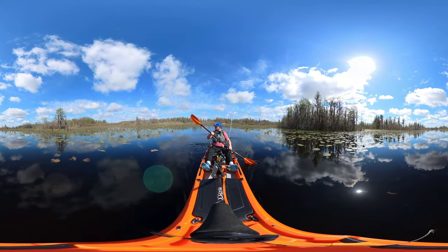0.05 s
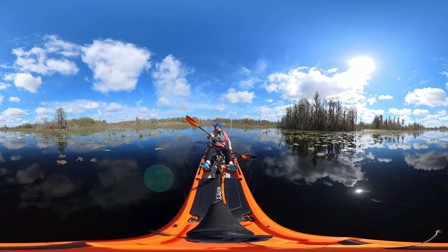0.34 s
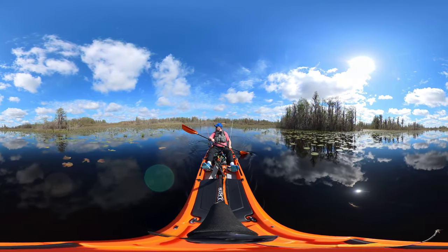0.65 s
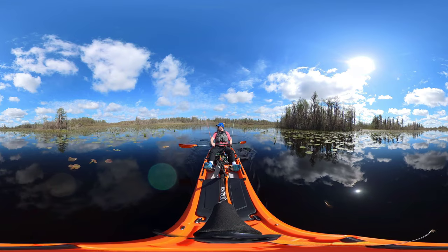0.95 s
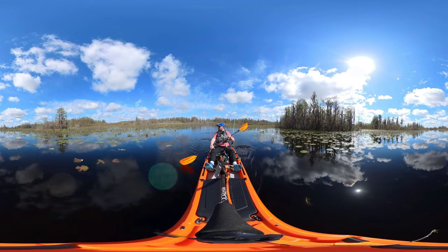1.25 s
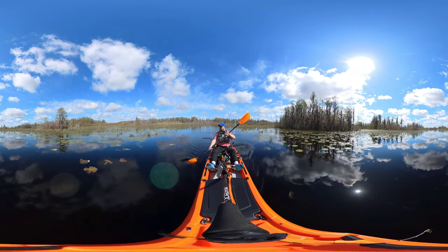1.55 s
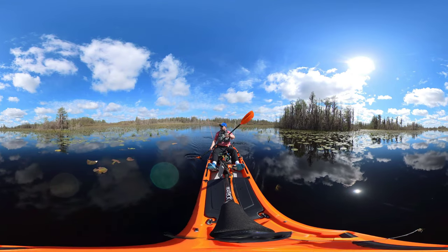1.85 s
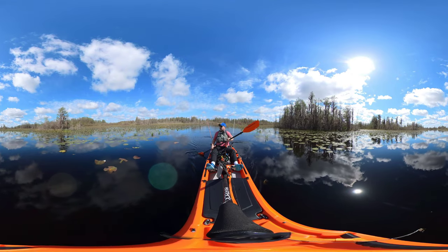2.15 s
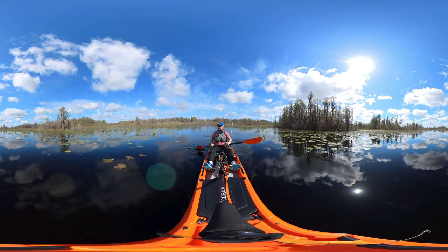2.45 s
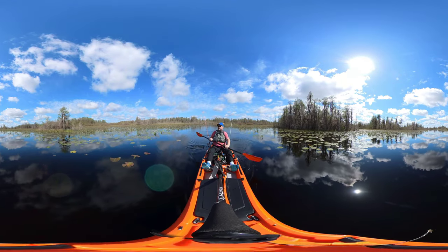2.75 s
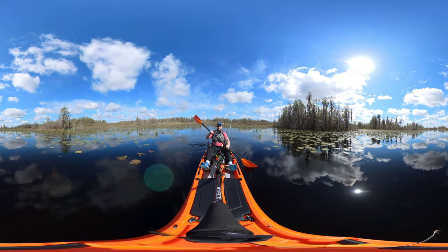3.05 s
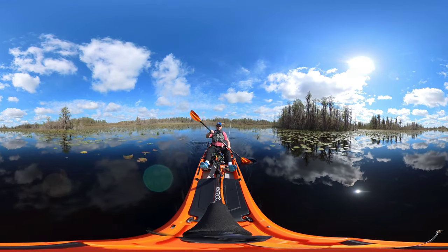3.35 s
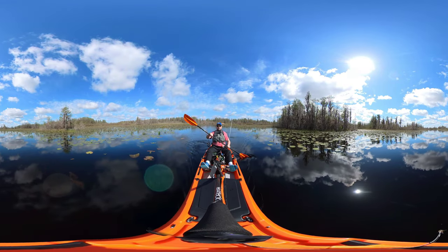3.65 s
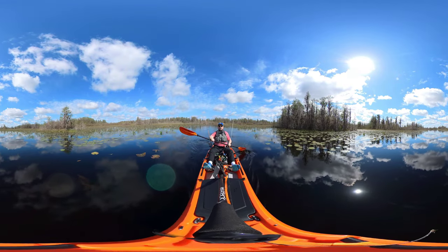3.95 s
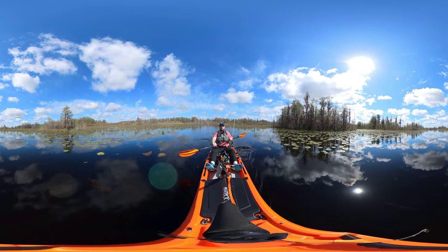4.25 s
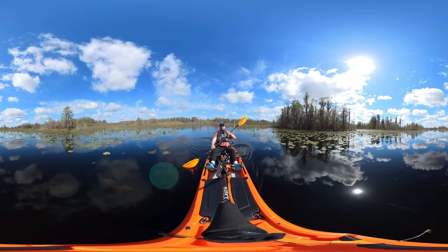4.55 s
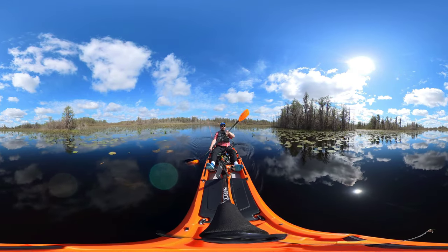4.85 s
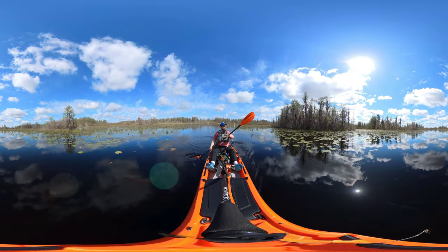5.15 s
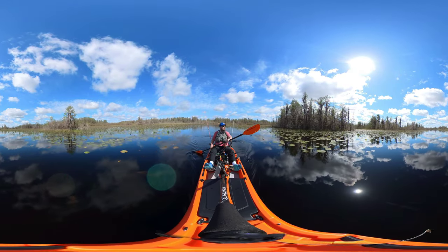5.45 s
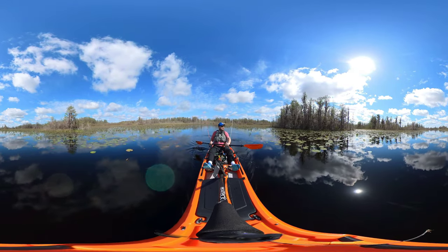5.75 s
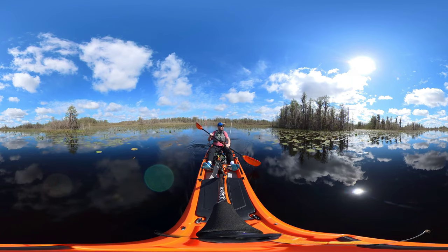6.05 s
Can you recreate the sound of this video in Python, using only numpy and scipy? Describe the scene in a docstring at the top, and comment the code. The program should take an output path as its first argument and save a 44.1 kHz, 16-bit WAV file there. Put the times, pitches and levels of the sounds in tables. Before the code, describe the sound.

A kayak paddle pulls four easy strokes through calm water, gurgling and dripping, with soft hull knocks and low wind rumble on the microphone.

```python
"""A kayak paddle pulls four easy strokes through a calm swamp, heard from the bow.
The blade churns up air bubbles, which ring (the smaller, the higher), and throws off spray.
Water drips and smacks down from the raised blade, among low glugs of water and soft knocks on the hull.
Light wind rumbles and thumps at the microphone over a very quiet open-air hush."""
import sys
import numpy as np
from scipy import signal
from scipy.fft import rfft, irfft
from scipy.io import wavfile
from scipy.ndimage import uniform_filter1d

SR = 44100
rng = np.random.default_rng(int(sys.argv[2]) if len(sys.argv) > 2 else 0)


def transcribe(u):
    """Save the signal u as a 16-bit wav file named by the first command-line argument.

    u: samples, shape (n,) or (channels, n), limited to [-1, 1]; the rate is SR.
    q: integer samples, one column per channel.
    """
    v = np.clip(np.atleast_2d(u).T, -1, 1)
    q = np.round(v * 32767).astype(np.int16)
    wavfile.write(sys.argv[1], SR, q)


N = 273420
TIME = np.arange(N) / SR

# how hard the blade stirs the water, one list per stroke: t/s, churn level/dB, splash level/dB
STROKES = [
    [(.84, -87, -83.5), (.92, -61, -81.5), (1.01, -67.5, -71), (1.1, -63, -76.5), (1.18, -66, -68.5),
     (1.27, -66.5, -76), (1.34, -72, -76), (1.43, -72, -103)],
    [(2.25, -84, -91), (2.33, -78, -89), (2.48, -78, -85.5), (2.54, -84.5, -85), (2.68, -71.5, -78),
     (2.75, -83.5, -85), (2.81, -64.5, -71), (2.86, -70.5, -73), (2.92, -83, -87)],
    [(3.8, -80, -86.5), (4.06, -75.5, -86), (4.12, -59, -67.5), (4.21, -72, -72), (4.27, -66, -84),
     (4.37, -62, -67), (4.45, -65, -78.5), (4.53, -89, -90.5), (4.7, -70, -83)],
    [(5.33, -88, -85), (5.37, -68, -85), (5.57, -74.5, -80), (5.6, -61, -71.5), (5.7, -62.5, -76),
     (5.77, -67, -86.5), (5.86, -64, -75.5), (5.93, -76, -88), (6.08, -64, -70.5), (6.19, -76, -94)],
]
# the other blade dips in and leaves a wake: t/s, churn level/dB, splash level/dB
BLADE_DIPS = [(0, -81.5, -84.5), (1.488, -72, -81.5), (3.37, -87.5, -85), (4.752, -73, -82)]
# how loud each pitch is in the gurgle, the fine spray and the larger drops: f/Hz, relative level/dB
GURGLE_SPECTRUM = [(380, -0.5), (550, 1), (850, 6.5), (1300, 8.5), (1800, 5.5), (2300, 4)]
SPRAY_SPECTRUM = [(2200, 7.5), (3000, -12.5), (3800, 0.5), (4900, -6.5), (6000, -9), (7200, 9.5),
                  (8500, -23)]
DROPLET_SPECTRUM = [(1900, -7), (2600, -6), (3600, -2), (5200, -0.5), (6600, -10)]
# the slosh around the blade and the sheet of water running off it: f/Hz, relative level/dB
SLOSH_SPECTRUM = [(150, -33.5), (330, -12.5), (480, -0.5), (850, -1.5), (1400, -14.5), (2100, -15),
                  (3200, -19), (6000, -50.5)]
SHEET_SPECTRUM = [(200, -45.5), (1200, 1.5), (2200, -11.5), (3500, -12.5), (5000, -7), (6300, -9.5),
                  (8000, -27), (9500, -27.5)]
# large air bubbles: loudest at t/s, f/Hz, level/dB, swell/s, ring/s, glide/(octaves per s)
PLOPS = [(.237, 674, -59.5, 0.00036, .008, -0.5), (.259, 938, -57.5, .0015, 0.0074, 6),
         (.657, 625, -52.5, .002, 0.015, 18), (.655, 875, -67, .012, .005, 24),
         (.672, 1188, -58, 0.011, .007, 29.5), (.7, 1305, -57, 0.014, .006, 44.5),
         (.749, 1450, -51.5, 0.0014, 0.0061, 20), (.909, 591, -41.5, 0.0038, 0.006, 6),
         (.976, 590, -42, 0.0025, 0.0085, 8), (1.032, 942, -47, 0.0031, .005, -14),
         (1.07, 773, -49.5, 0.002, 0.0097, 0.5), (1.131, 428.5, -42.5, 0.00098, 0.021, -5),
         (1.15, 790, -39, 0.00025, 0.0018, 4), (1.215, 448, -53.5, 0.0098, 0.01, -7.5),
         (1.253, 1340, -52, .003, 0.0088, 27.5), (1.267, 899, -48, .005, 0.0018, -5.5),
         (1.494, 976, -37, 0.0028, 0.00088, 12.5), (1.5, 352, -42.5, .005, 0.0031, -11.5),
         (1.649, 1003, -60, 0.0067, 0.0066, 18.5), (1.781, 1166, -58, .012, 0.0025, 12.5),
         (2.314, 1152, -55.5, 0.0014, 0.0035, 53), (2.379, 1610, -51.5, 0.0023, 0.003, 31),
         (2.624, 1800, -58, .0035, 0.0068, -14), (2.688, 947, -51.5, 0.0091, 0.0038, 26),
         (2.77, 1660, -53.5, 0.00085, 0.0066, -8), (2.697, 1336, -53.5, .007, .0012, 29.5),
         (2.769, 950, -54.5, 0.0028, .0046, -1), (2.804, 821, -46.5, .0013, 0.021, -1.5),
         (2.814, 458, -57, .002, .021, -4.5), (2.864, 806, -41.5, 0.0019, 0.0072, -3.5),
         (2.909, 1008, -62.5, 0.0055, .01, 3.5), (2.989, 750, -62, .003, .015, -9),
         (3.371, 1210, -45, 0.0016, 0.00094, 27), (3.526, 624, -63.5, .002, 0.021, 5.5),
         (3.552, 1466, -63, 0.0041, 0.012, 11.5), (3.617, 1358, -43.5, 0.005, 0.0044, 9.5),
         (3.683, 1607, -54.5, 0.0035, .0024, -23.5), (3.754, 608, -59.5, 0.0022, .008, -2),
         (3.825, 1275, -50, 0.0042, .0013, -12), (3.873, 1540, -49.5, 0.0019, 0.0036, -20),
         (3.935, 1367, -57, 0.0028, .008, 18.5), (3.961, 737, -57.5, 0.0023, .017, 4),
         (4.001, 1440, -53.5, 0.0028, .003, 4), (4.005, 529, -52.5, 0.0034, 0.03, 12),
         (4.006, 738, -51, 0.0068, 0.0076, 14), (4.124, 830, -46, 0.0073, 0.00086, -5),
         (4.149, 837, -50.5, 0.0012, .009, 12), (4.195, 1290, -50, 0.0026, 0.01, 14.5),
         (4.226, 1277, -54.5, 0.013, 0.0026, 4), (4.278, 375, -43, .005, 0.0016, 58),
         (4.325, 1010, -51, .009, 0.013, -6.5), (4.344, 488, -43.5, 0.0039, 0.022, -7.5),
         (4.497, 715, -48.5, 0.0082, 0.0078, 33), (4.749, 602, -32, 0.00021, 0.0011, 0),
         (4.84, 574, -57.5, 0.0061, .01, 0.5), (5.351, 917, -57.5, .0014, .003, 9),
         (5.371, 886, -53.5, 0.0018, 0.0019, 10), (5.428, 1864, -54, 0.00042, .004, 39),
         (5.459, 1056, -55, 0.0015, .006, 3), (5.541, 1180, -46, 0.0014, 0.0022, 32),
         (5.605, 473, -52, 0.0046, .008, 5.5), (5.639, 1240, -54, .011, 0.0085, 16.5),
         (5.666, 419, -46, .003, 0.0043, 31), (5.681, 1510, -49.5, 0.0024, .003, 8),
         (5.699, 768, -46.5, 0.00047, 0.0034, 53), (5.849, 1456, -51, 0.0028, 0.0055, -9.5),
         (5.991, 720, -57.5, 0.003, 0.017, 25)]
# drops falling from the raised blade: t/s, f/Hz, level/dB, ring/s
DRIPS = [(0.259, 3750, -64, 0.0031), (.259, 1430, -60.5, .002), (0.389, 1550, -49, 0.00065),
         (0.776, 2610, -57, 0.0021), (.993, 4660, -53.5, 0.0022), (1.06, 2190, -48, 0.00068),
         (1.079, 5070, -48, 0.00022), (1.08, 2600, -50.5, .0012), (1.164, 2610, -49.5, .0008),
         (1.174, 1820, -44, .001), (1.176, 2730, -46, 0.00091), (1.281, 2630, -52, .0008),
         (1.312, 5470, -54, .0005), (1.321, 2320, -52, .0007), (1.335, 5260, -48.5, 0.00086),
         (1.527, 2880, -57, .0017), (1.569, 2890, -45, 0.00044), (1.601, 2670, -55, 0.0011),
         (1.868, 7190, -54, 0.0001), (2.651, 2260, -55, 0.0018), (2.692, 6370, -49, 0.00014),
         (2.768, 6630, -59, .002), (2.797, 2320, -55.5, 0.0025), (2.804, 1440, -46, 0.00072),
         (2.81, 5200, -44, 0.0002), (2.848, 5770, -46, 0.00036), (2.942, 2850, -58, 0.0037),
         (2.98, 5130, -57, .0006), (3.013, 6020, -59, 0.00043), (3.465, 3000, -57, 0.0045),
         (3.512, 2714, -62, 0.0022), (3.611, 1970, -44, .0007), (3.873, 2460, -53, 0.00044),
         (3.96, 3280, -61.5, 0.0009), (4.017, 2280, -60.5, .002), (4.083, 1776, -52, .005),
         (4.108, 4750, -43.5, 0.0007), (4.108, 3610, -49, .002), (4.136, 6117, -51, 0.0013),
         (4.369, 4700, -45, .0015), (4.377, 2410, -50.5, 0.0024), (4.378, 5630, -44.5, 0.00027),
         (4.748, 1450, -43, 0.0013), (4.93, 7060, -61.5, .0006), (5.54, 5900, -47, 0.00054),
         (5.594, 2370, -51, .0008), (5.602, 1850, -50.5, .0035), (5.605, 6400, -50.5, .0006),
         (5.627, 2510, -48, .0007), (5.695, 2350, -47.5, .002), (5.71, 5900, -55, 0.00057),
         (6.07, 1320, -41.5, 0.00022), (6.071, 2210, -46.5, 0.0013)]
# water smacking the surface: t/s, centre f/Hz, level before fading/dB, decay/s
SPLATS = [(.388, 1880, -63, 0.0086), (.638, 590, -59, 0.034), (.776, 2090, -74, .043),
          (1.026, 1700, -60, 0.018), (1.074, 3500, -62.5, 0.017), (1.171, 4500, -65, .012),
          (1.256, 2240, -54.5, 0.011), (1.319, 5500, -67, 0.011), (1.491, 650, -53.5, .041),
          (1.568, 3200, -77, .018), (1.866, 6500, -58, 0.0024), (2.026, 1500, -63.5, 0.013),
          (2.344, 1440, -68, 0.025), (2.442, 1550, -60.5, 0.023), (2.477, 3000, -43, 0.0031),
          (2.649, 1550, -52, 0.0039), (2.845, 4870, -68, 0.0035), (3.372, 1430, -64.5, 0.0052),
          (3.467, 3300, -65, .006), (3.612, 1760, -69, 0.01), (3.68, 1500, -54, 0.0053),
          (3.873, 2600, -62.5, 0.009), (4.077, 1780, -62, 0.0073), (4.105, 3960, -31.5, 0.0014),
          (4.204, 2180, -57.5, 0.013), (4.75, 1190, -57, 0.0033), (5.366, 1100, -58, 0.01),
          (5.548, 1170, -37.5, 0.0037), (5.592, 2200, -53, 0.012), (5.697, 2480, -64, 0.019),
          (5.847, 1720, -56, 0.012), (6.07, 2800, -62, 0.012)]
# low glugs of water and soft knocks on the hull: t/s, level/dB, brightness/(dB per octave)
GLUGS_AND_KNOCKS = [(0.155, -50.5, -8), (1.105, -39.5, 2.5), (1.35, -58, 9), (1.504, -38, -5),
                    (1.776, -56.5, 0), (2.024, -45, -3), (4.541, -41, -4), (4.926, -36.5, -18),
                    (5.093, -42.5, -6), (5.366, -40, -4)]
# the hollow tones in each glug or knock: f/Hz, relative level/dB, (time to fade by 60 dB)/s
HOLLOW_TONES = [(195, 2, 0.022), (233.4, -12, 0.11), (343.3, -3.5, 0.095), (450, -19.5, 0.18),
                (489, -25.5, 0.13), (670, -9, 0.025), (814, -14, 0.076), (955, -6, 0.02)]
# wind gusts at the microphone: t/s, relative level/dB, sharpness/dB
GUSTS = [(0, -60, 7), (.26, -59, -6.5), (.38, -53, -6), (.5, -45.5, 1.5), (.67, -44, -22), (.76, -37, 0),
         (.84, -49.5, -6), (.9, -39.5, 6.5), (1.06, -56, 9.5), (1.13, -65.5, -19), (1.3, -57.5, 0.5),
         (1.55, -53.5, 4), (1.63, -60, -7), (1.8, -47.5, -9), (1.94, -51, -17), (2.02, -44, -2),
         (2.12, -36, -14), (2.21, -47.5, -10), (2.31, -37.5, -10), (2.53, -66, -14), (2.68, -53, -7),
         (2.78, -69, -7), (3.0, -68, -9), (3.13, -65.5, -10), (3.28, -73, 6), (3.44, -69.5, 6),
         (3.54, -48.5, -24), (3.66, -69, -5), (3.74, -62.5, -15.5), (3.8, -46.5, 2.5), (3.94, -37.5, -0.5),
         (4.04, -42.5, 7), (4.19, -39, 4.5), (4.32, -40.5, 11.5), (4.5, -37.5, 12), (4.62, -39.5, 2),
         (4.85, -43.5, 2), (4.98, -34, 7), (5.13, -39.5, -6), (5.25, -53.5, -20), (5.38, -48.5, 7.5),
         (5.45, -39.5, -1), (5.61, -37, 11.5), (5.8, -40, -2), (5.95, -52, -3), (6.1, -44, 8.5),
         (6.2, -39.5, -32)]
# the wind's rumble: f/Hz, relative level/dB
RUMBLE_SPECTRUM = [(10, -35), (20, -19.5), (35, -2.5), (55, 3.5), (80, 1), (120, -4), (165, -12),
                   (240, -27.5), (340, -39), (500, -51), (900, -63), (2000, -88.5)]
# single swirls of air that thump the microphone: t/s, f/Hz, level/dB, half length/s
BUFFETS = [(0.148, 85.4, -48, .02), (0.436, 123, -42.5, 0.014), (.565, 59.3, -26, 0.021),
           (.74, 137, -36.5, 0.0046), (1.055, 61.3, -39, 0.017), (1.386, 55.6, -43.5, 0.032),
           (2.003, 92.5, -33.5, 0.0075), (2.127, 75, -37, 0.036), (3.358, 83, -40, 0.021),
           (3.953, 114, -27, 0.0039), (4.112, 76.5, -20, 0.0079), (4.404, 143, -27, 0.0055),
           (4.435, 70, -27.5, 0.0099), (4.55, 110, -24.5, 0.0075), (4.699, 67.6, -28, 0.015),
           (4.92, 74.3, -21, 0.012), (4.946, 78, -16, 0.0083), (5.607, 162, -27.5, 0.0038),
           (5.64, 55.5, -25, 0.019), (5.8, 71, -27.5, 0.016)]
# still air over the swamp: f/Hz, relative level/dB
HUSH_SPECTRUM = [(20, 15.5), (70, 12), (130, 4.5), (190, 6), (300, 3.5), (700, -8.5), (1500, -19.5),
                 (3000, -12.5), (4200, -14), (5400, -12.5), (6500, -14.5), (8000, -23), (9500, -33)]


def strokes(gurgle_db=3.0, slosh_db=-0.5, spray_db=-1.5, sheet_db=2.5, breaking_db=-69.0):
    """The blade churns low bubbles under water and sheds fine spray above it."""
    churn, splash = stirring()
    gurgle = swarm(GURGLE_SPECTRUM, per_s=420, cycles=5.44, spread_db=6.0, glide=12, pitches=70)
    gurgle = gain_of(gurgle_db) * steadied(gurgle, span_s=.075)
    spray = swarm(SPRAY_SPECTRUM, per_s=150, cycles=6.3, spread_db=15, glide=17, pitches=70)
    spray = gain_of(spray_db) * steadied(spray, span_s=.022)
    slosh = gain_of(slosh_db) * ragged(noise(SLOSH_SPECTRUM), depth_db=.5, span_s=.024)
    sheet = gain_of(sheet_db) * ragged(noise(SHEET_SPECTRUM), depth_db=4.5, span_s=.0072)
    # gentle lapping mostly gurgles; a harder pull breaks the surface and sloshes
    breaking = churn / (churn + gain_of(breaking_db))
    return churn * (gurgle + breaking * slosh) + splash * (spray + sheet)


def stirring(lap_db=-88.5, settle_s=.025, wake_s=.18):
    """How strong the churn under water and the splash above it are at each moment."""
    power = np.zeros((2, N))
    power[0] = gain_of(lap_db) ** 2  # water laps steadily at the gliding hull
    for stroke in STROKES:
        start, end = stroke[0][0], stroke[-1][0]
        outside_s = np.maximum(start - TIME, 0) + np.maximum(TIME - end, 0)
        power += (gain_of(curves(stroke)) * np.exp(-outside_s / settle_s)) ** 2
    for s, churn_db, splash_db in BLADE_DIPS:
        wake = (TIME > s) * np.exp(-abs(TIME - s) / wake_s)
        power += (gain_of([[churn_db], [splash_db]]) * wake) ** 2
    return np.sqrt(power)


def bubble(hz, swell_s, ring_s, glide):
    """A bubble swells as it pinches off, then rings away. Gives the seconds to its peak and its sound."""
    swell_s = np.hypot(swell_s, .0006)  # never quicker than 0.6 ms
    t = np.arange(-4 * swell_s, 7 * ring_s, 1 / SR)
    loudness = np.where(t < 0, np.exp(-abs(t / swell_s) ** 1.5), np.exp(-abs(t) / ring_s))
    # the pitch glides as the bubble nears or leaves the surface, by half an octave at most each way
    pitch = hz * 2 ** (.5 * np.tanh(2 * glide * t))
    return -t[0], loudness * np.sin(2 * np.pi * (np.cumsum(pitch) / SR + rng.random()))


def swarm(spectrum, per_s, cycles, spread_db, glide, pitches):
    """A random crowd of small bubbles; each rings for a few cycles, so high ones are short."""
    out, tries = np.zeros(N), 100
    chance = per_s * TIME[-1] / (tries * pitches)
    for hz in np.geomspace(spectrum[0][0], spectrum[-1][0], pitches):
        ring_s = cycles / hz * 2 ** rng.uniform(-1.1, 1)
        swell_s = ring_s * rng.uniform(.3, 1)
        _, sound = bubble(hz, swell_s, ring_s, glide * rng.uniform(-.14, 1))
        sound *= gain_at(spectrum, hz)
        for when, faintness, dice in rng.random((tries, 3)):
            if dice < chance:
                db = -spread_db * np.log(faintness + .021)  # many are faint, a few stand out
                add(out, when * TIME[-1], gain_of(db) * sound)
    return out


def trickle(blips_db=-11.0, droplets_db=0.5):
    """A few bubbles blip up from the churned water, and larger drops plink in the splash."""
    churn, splash = stirring()
    blips = swarm(GURGLE_SPECTRUM, per_s=37, cycles=7.5, spread_db=4.5, glide=11, pitches=40)
    blips = gain_of(blips_db) * steadied(blips, span_s=.15)
    droplets = swarm(DROPLET_SPECTRUM, per_s=75, cycles=4.5, spread_db=5.0, glide=18, pitches=30)
    droplets = gain_of(droplets_db) * steadied(droplets, span_s=.047)
    return churn * blips + splash * droplets


def plops():
    """Each plop is one large air bubble ringing in the water."""
    out = np.zeros(N)
    for s, hz, db, swell_s, ring_s, glide in PLOPS:
        lead_s, sound = bubble(hz, swell_s, ring_s, glide)
        add(out, s - lead_s, gain_of(db) * sound)
    return out


def drips():
    """Each drop traps a tiny bubble whose pitch rises as it rings."""
    out = np.zeros(N)
    for s, hz, db, ring_s in DRIPS:
        lead_s, sound = bubble(hz, swell_s=.0007, ring_s=ring_s, glide=26.0)
        add(out, s - lead_s, gain_of(db) * sound)
    return out


def splats(width_octaves=.47, attack_s=.003):
    """Water off the blade smacks the surface and breaks into a short burst of droplets."""
    out, t = np.zeros(N), np.arange(4096) / SR
    hz = np.fft.rfftfreq(len(t), 1 / SR) + 1
    attack = 1 - np.exp(-(t / attack_s) ** 2)
    for s, centre_hz, db, decay_s in SPLATS:
        droplets = clicks(len(t), share=.06)
        band = np.exp(-.5 * (np.log2(hz / centre_hz) / width_octaves) ** 2)
        burst = unit_level(irfft(rfft(droplets) * band))
        add(out, s, gain_of(db) * burst * np.exp(-t / decay_s) * attack)
    return out


def with_echoes(x, echo_db=-8.0, fade_s=.13, step_s=.12, tails=5):
    """Boat and water throw back a short tail of echoes, which changes as the blade moves about."""
    t, out = np.arange(SR // 4) / SR, x.copy()
    for k in range(tails):
        tail = clicks(len(t), share=.08) * gain_of(-60 * t / fade_s) * (t > .002)
        turn = (TIME / step_s - k + 1) % tails  # the tails take turns, each blending into the next
        blend = np.sin(np.pi / 2 * turn) * (turn < 2)
        out += gain_of(echo_db) * signal.oaconvolve(x * blend, tail / np.linalg.norm(tail))[:N]
    return out


def glugs_and_knocks(attack_s=.003):
    """Low glugs of water and soft knocks on the hull, each ringing with the same few hollow tones."""
    out, t = np.zeros(N), np.arange(SR // 5) / SR
    attack = 1 - np.exp(-(t / attack_s) ** 2)
    for s, db, brightness in GLUGS_AND_KNOCKS:
        for hz, tone_db, fade_s in HOLLOW_TONES:
            tilt_db = brightness * np.log2(hz / HOLLOW_TONES[2][0])
            ring = gain_of(db + tone_db + tilt_db - 60 * t / fade_s) * attack
            add(out, s, ring * np.sin(2 * np.pi * (hz * t + rng.random())))
    return out


def wind(boost_db=2.0, flutter_db=-12.0, split_hz=111.6):
    """Swirling air hits the microphone in lumps; sharper swirls reach higher in pitch."""
    gust_db, sharp_db = curves(GUSTS)
    air = noise(RUMBLE_SPECTRUM)
    deep = signal.sosfiltfilt(signal.butter(4, split_hz, fs=SR, output="sos"), air)
    rumble = steadied(deep, span_s=.035)
    flutter = gain_of(flutter_db + sharp_db) * steadied(air - deep, span_s=.23)
    lumps = ragged(np.ones(N), depth_db=3.92, span_s=.034)
    return gain_of(gust_db + boost_db) * lumps * (rumble + flutter)


def buffets(core_hz=184.6, core_s=.0036, core_db=-16.5):
    """Each swirl of air pushes, then sucks as it passes; its sharp core adds a quicker flap."""
    out = np.zeros(N)
    for s, hz, db, half_s in BUFFETS:
        t = TIME - s
        swing = -np.exp(-(t / half_s) ** 2) * np.sin(2 * np.pi * hz * t)
        flap = np.exp(-(t / core_s) ** 2) * np.sin(2 * np.pi * (core_hz * t + rng.random()))
        out += gain_of(db) * (swing + gain_of(core_db) * flap)
    return out


def hush(level_db=-73.5):
    """Still air over the swamp makes a faint, steady noise."""
    return gain_of(level_db) * noise(HUSH_SPECTRUM)


def gain_of(db):
    """Turns decibels into a number to multiply a sound by."""
    return 10 ** (np.asarray(db) / 20)


def gain_at(spectrum, hz):
    """How strong a spectrum is at hz, filling in between its rows along the musical scale."""
    f, db = np.transpose(spectrum)
    return gain_of(np.interp(np.log(hz + 1), np.log(f + 1), db))


def unit_level(x):
    """Scales a sound so that its average power is 1."""
    return x / np.sqrt(np.mean(x ** 2) + 1e-20)


def curves(rows):
    """Joins a table's timed points with straight lines, one curve per value column."""
    s, *columns = np.transpose(rows)
    return [np.interp(TIME, s, column) for column in columns]


def add(mix, s, sound):
    """Mixes a sound in, starting at s seconds."""
    part = mix[max(round(s * SR), 0):][:len(sound)]
    part += sound[:len(part)]


def clicks(length, share):
    """Random clicks on about this share of the samples, with silence between."""
    return rng.standard_normal(length) * (rng.random(length) < share)


def noise(spectrum):
    """Steady noise with the given balance of low and high pitches."""
    white = rfft(rng.standard_normal(N))
    return unit_level(irfft(white * gain_at(spectrum, np.fft.rfftfreq(N, 1 / SR)), N))


def smoothed(x, span_s):
    """Averages twice over span_s seconds."""
    size = int(span_s * SR)
    return uniform_filter1d(uniform_filter1d(x, size), size)


def steadied(x, span_s):
    """Evens out swells slower than span_s and keeps the fine grain."""
    power = smoothed(unit_level(x) ** 2, span_s)
    return x / np.sqrt(np.mean(x ** 2) * (abs(power) + .01))


def ragged(x, depth_db, span_s):
    """Makes the level flicker at random, about every span_s seconds."""
    flicker = unit_level(smoothed(rng.standard_normal(N), span_s))
    return unit_level(x * gain_of(depth_db * flicker))


def scene():
    """Water, boat, wind and hush together in one channel."""
    water = with_echoes(plops() + drips() + splats() + strokes() + trickle())
    return (water + glugs_and_knocks() + wind() + buffets() + hush())[None]


def record(dry):
    """Cuts away the highest treble."""
    low_pass = signal.firwin(255, cutoff=9300, window=("kaiser", 8), fs=SR)
    return signal.oaconvolve(dry, low_pass[None], "same")


dry = scene()
out = record(dry)
transcribe(out)
```